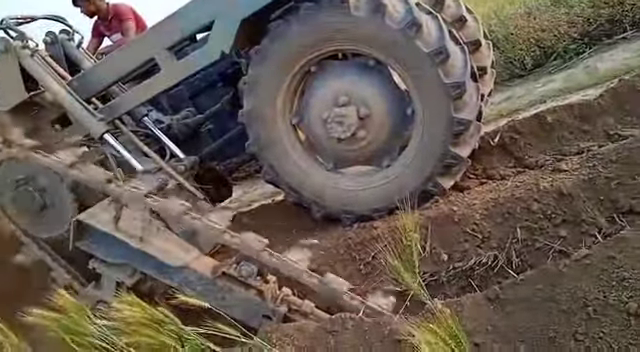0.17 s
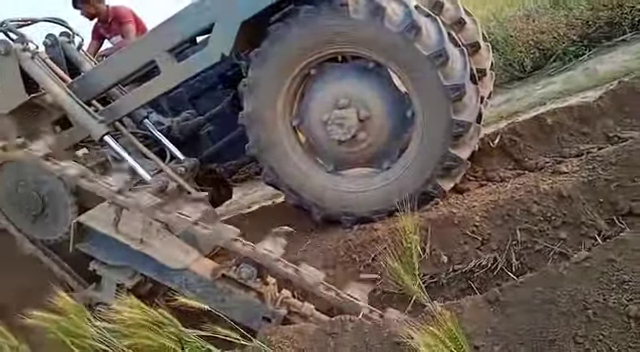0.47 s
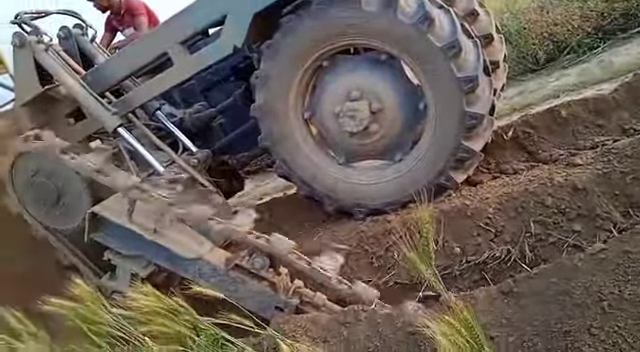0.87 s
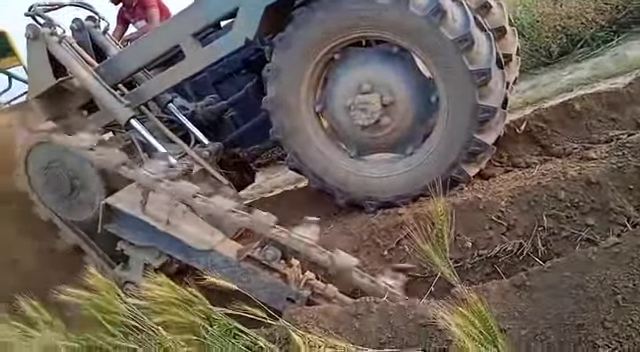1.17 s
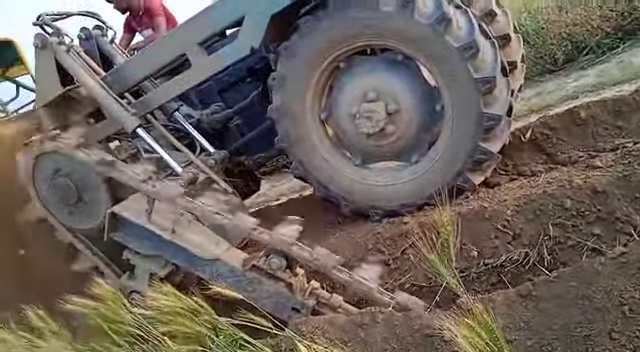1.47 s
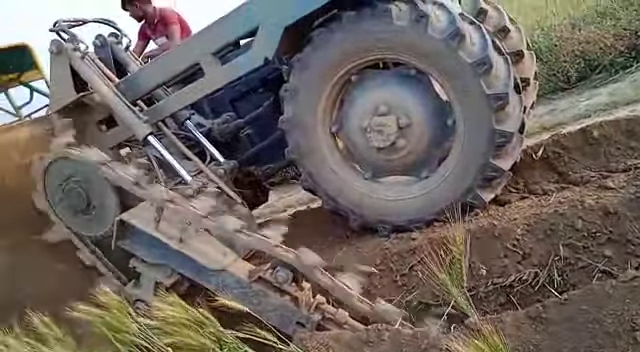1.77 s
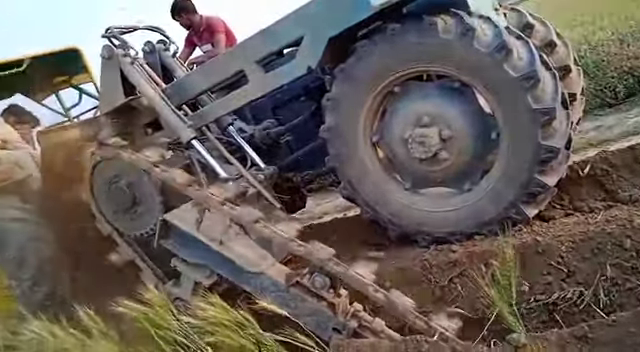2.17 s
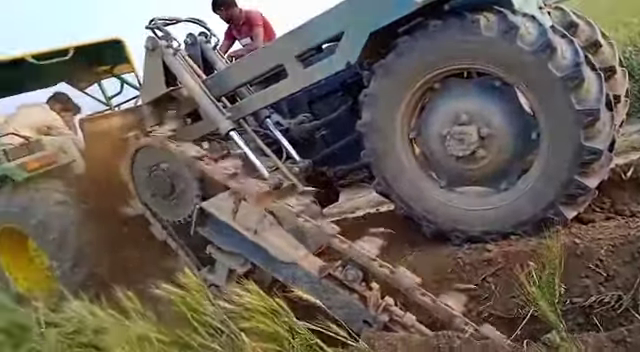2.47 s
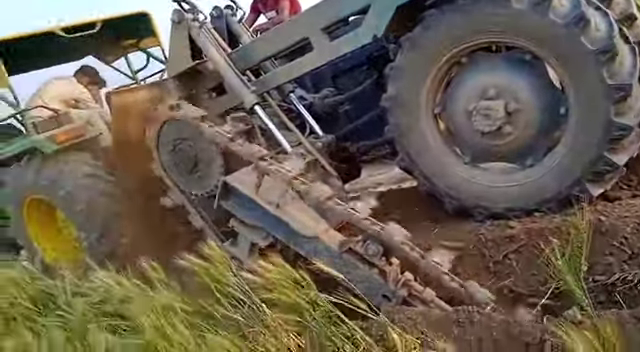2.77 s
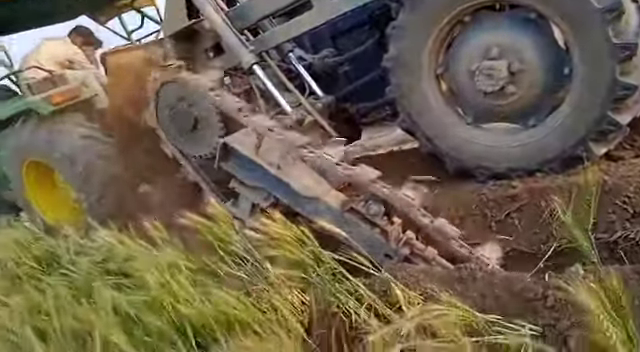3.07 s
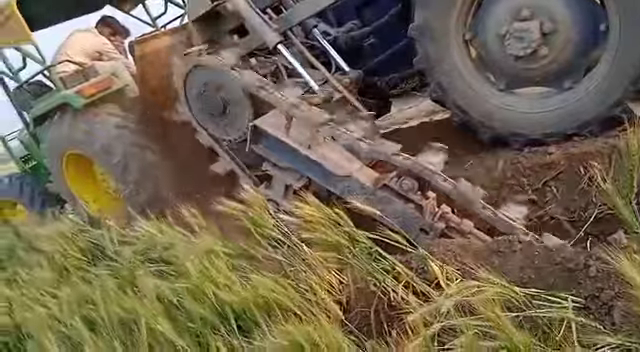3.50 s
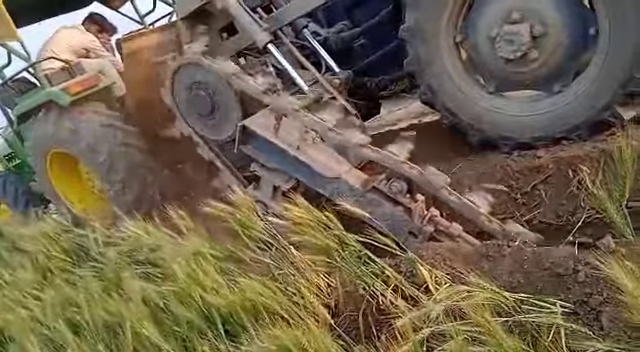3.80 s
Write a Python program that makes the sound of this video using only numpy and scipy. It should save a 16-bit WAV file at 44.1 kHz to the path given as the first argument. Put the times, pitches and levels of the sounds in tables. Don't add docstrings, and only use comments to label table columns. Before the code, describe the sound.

Loud close tractor diesel with a clanking, pinging trencher chain grinding steadily through earth

```python
import sys
import numpy as np
from scipy import signal
from scipy.fft import rfft, irfft, next_fast_len
from scipy.io import wavfile
from scipy.ndimage import uniform_filter1d, map_coordinates

SR = 44100
rng = np.random.default_rng(int(sys.argv[2]) if len(sys.argv) > 2 else 0)


def decibels_to_gain(level_db):
    exponent = np.asarray(level_db, float) / 20
    return 10 ** exponent


def output_pcm(signal):
    pcm = np.clip(np.atleast_2d(signal).T, -1, 1) * 32767
    wavfile.write(sys.argv[1], SR, np.round(pcm).astype(np.int16))


N = 173754

# time in seconds, level in dB.
EFFORT = [(0.0, -27), (.45, -24.5), (.9, -27), (1.3, -27.5), (1.63, -27.5), (1.95, -26.5), (2.23, -25),
          (2.6, -25.5), (2.95, -27.5), (3.3, -27), (3.6, -27), (3.94, -28)]
# time in seconds, lead in cycles.
CRANK_LEAD = [(0, .02), (.8, .01), (1.4, -.1), (2.1, -.09), (2.5, 0), (3, -.08), (3.5, -.18), (3.94, -.17)]
CYLINDER_DB = [-3, -5, -3.5, -6.5]
# frequency in Hz, gain in dB.
BLOCK = [(500, -21), (900, -8), (1700, 0), (2600, -3), (3600, -11.5), (5400, -12.5), (6500, -7),
         (8000, -14)]
# time in seconds, level in dB.
EXHAUST = [
    (0.0, -46),
    (0.06, -40),
    (0.44, -37),
    (3.94, -45),
]
# start in seconds, peak in dB, ring in Hz.
CLANKS = [(0.0547, -10.5, 1610), (0.1123, -17, 1830), (0.166, -8, 1717), (0.2243, -12.5, 1800),
          (0.5493, -18.5, 2455), (0.6148, -15, 1270), (0.7813, -13, 1616), (1.0096, -17, 2020),
          (1.346, -24.5, 1600), (1.519, -27, 1260), (1.583, -14, 1354), (1.6268, -19, 2430),
          (1.6832, -12.5, 1670), (1.786, -18.5, 2380), (1.8487, -21.5, 2080), (1.9015, -13, 1926),
          (1.9605, -10.5, 1796), (2.0127, -24, 1340), (2.0698, -10.5, 1597), (2.1288, -13.5, 1774),
          (2.1824, -11.5, 1720), (2.346, -33, 1730), (2.459, -15.5, 1346), (2.6883, -11, 1770),
          (3.1981, -12.5, 1745), (3.3637, -16, 1654), (3.4337, -11.5, 1800), (3.7515, -16, 2314)]
# start in seconds, peak in dB, ring in Hz.
STONES = [(0.015, -13, 2720), (0.073, -23, 2190), (0.186, -9, 1680), (0.237, -20.5, 1780),
          (0.3016, -17.5, 2420), (0.385, -12.5, 1180), (0.656, -14.5, 2410), (0.6794, -12.5, 1062),
          (0.6982, -15.5, 2450), (0.9082, -13, 1820), (1.4008, -14, 1940), (1.4162, -16, 2330),
          (1.5178, -15, 1260), (2.0308, -16.5, 1380), (2.1444, -22, 2400), (2.2474, -25.5, 1690),
          (2.36, -13, 1715), (2.4173, -14, 1800), (2.528, -15.5, 1280), (2.6279, -16.5, 3270),
          (2.6993, -10, 1495), (2.909, -14, 1600), (2.9946, -39, 2070), (3.0201, -25, 2840),
          (3.2121, -14, 1660), (3.2496, -14.5, 1040), (3.5446, -20, 1730), (3.7235, -23, 2410),
          (3.8253, -23.5, 2270), (3.9167, -21, 1480)]
# start in seconds, peak in dB, ring in Hz.
PINS = [(.0174, -12, 3330), (.0717, -27.5, 3620), (.2224, -15, 3204), (.6739, -17, 3170), (.965, -26, 3330),
        (1.0086, -20, 3280), (1.5189, -16.5, 3060), (1.905, -19.5, 3080), (2.0138, -22, 3160),
        (2.031, -16, 3220), (2.1425, -17.5, 3280), (2.2368, -14.5, 3230), (2.249, -17, 3240),
        (2.4598, -19.5, 3370), (2.478, -21, 3290), (2.6863, -19, 3210), (3.5289, -19, 2980),
        (3.825, -18.5, 3040)]
# start in seconds, peak in dB, ring in Hz.
THROBS = [(.286, -26, 256), (.372, -27, 290), (.47, -27, 265), (.625, -36, 285), (.72, -21.5, 251),
          (.876, -32, 278), (1.156, -23, 267.4), (1.26, -28, 256), (1.436, -20.5, 269.6), (1.59, -34, 260),
          (1.698, -20.5, 257.3), (2.345, -21, 260), (2.42, -19.5, 277), (2.86, -23, 267),
          (2.96, -21, 253.5), (3.26, -30, 260), (3.477, -21.5, 249.7), (3.687, -22, 264), (3.878, -30, 295)]
# start in seconds, peak in dB, ring in Hz.
PINGS = [(0.0543, -29.5, 6730), (0.1412, -16.5, 6420), (0.2234, -14.5, 6440), (0.3084, -13.5, 6670),
         (0.3587, -15, 7130), (0.4165, -25, 6130), (0.5378, -19, 6170), (0.615, -19, 6330),
         (0.6607, -28, 5900), (0.6784, -15, 6200), (0.7, -17, 5950), (0.7392, -29.5, 6170),
         (0.8195, -25, 7170), (0.996, -12, 7230), (1.0517, -28, 6630), (1.185, -24, 6000),
         (1.2072, -27.5, 6000), (1.4185, -22, 6200), (1.5422, -16.5, 7160), (1.5688, -20.5, 6500),
         (1.735, -17, 6420), (1.837, -17, 6820), (1.8637, -19.5, 6240), (1.921, -16, 6170),
         (1.962, -28, 6970), (2.0133, -15.5, 6270), (2.073, -13.5, 6930), (2.1291, -16, 6640),
         (2.2382, -9, 6550), (2.4593, -7, 6570), (2.5516, -23, 6140), (2.568, -18.5, 6170),
         (2.604, -19.5, 6430), (2.6294, -15, 6450), (2.7432, -28, 6400), (2.9108, -17.5, 7260),
         (2.9278, -17, 6270), (2.9965, -17.5, 5840), (3.1958, -25, 6070), (3.2126, -19, 6170),
         (3.237, -15.5, 6200), (3.4361, -7, 6170), (3.5289, -10, 6590), (3.5543, -14, 6900),
         (3.5982, -12, 6220), (3.696, -26.5, 7020), (3.7244, -19, 6250), (3.7813, -17, 6800),
         (3.823, -22.5, 6200), (3.8624, -22, 6740), (3.9015, -21, 6180), (3.917, -14.5, 5980)]
# start in seconds, peak in dB, ring in Hz.
TEETH = [
    (0.617, -27, 5050),
    (1.2391, -23, 5600),
    (1.9, -24, 5760),
    (2.0747, -14.5, 5470),
    (2.6274, -17, 5030),
    (2.9163, -20, 4300),
    (.366, -25.5, 4600),
    (.675, -28, 5150),
    (2.42, -23, 4000),
    (1.8, -26, 4060),
]
# frequency in Hz, gain in dB.
BOOM = [(500, -19.5), (900, -7), (1700, 0), (2600, -6.5), (3600, -12), (5400, -12.5), (6500, -11),
        (8000, -18)]
# frequency in Hz, gain in dB.
SPROCKET = [(4500, -30), (5900, -14), (6200, 0), (7000, -3), (8200, -20)]
# frequency in Hz, gain in dB.
ROAR = [(320, -37.5), (550, 2.5), (1040, 1), (1220, -4), (2410, 0), (3730, -16), (5350, -25), (6390, -10.5),
        (8000, -29), (10400, -59.5), (17600, -120)]
# frequency in Hz, gain in dB.
RUMBLE = [(15, -56.5), (25, -39), (56, -12.5), (151, -8.5), (264, -1.5), (342, -5), (462, -6), (599, -18.5),
          (650, -6), (840, -43.5), (1430, -120)]
# start in seconds, peak in dB.
PLATE_BLOWS = [(.26, -38), (0.4994, -32), (0.5706, -36), (0.7402, -29), (0.8185, -34), (1.07, -33),
               (1.19, -37), (1.26, -35), (1.3294, -31), (1.6994, -31), (1.8058, -34), (1.8994, -29),
               (2.0178, -31), (2.1784, -31), (2.2493, -31), (2.5594, -34), (2.9163, -33), (3.0864, -36),
               (3.2495, -33), (3.545, -33), (3.685, -32), (3.8342, -36)]
# centre in Hz, width in Hz, level in dB.
FRAME = [(458, 31, -8.5), (890, 8.7, -7.5), (1040, 16, -4.5), (1385, 61, -10.5), (1686, 63, -9.5),
         (2545, 140, -13.5), (6170, 130, -4.5), (6570, 91, -10)]
# time in seconds, share of the later bearing from 0 to 1.
TURN = [(0, 0), (1.9, 0), (2.3, 1), (3.94, 1)]
# frequency in Hz, gain in dB.
MICROPHONE = [(25, -12), (55, -12), (68, -1.5), (7600, 0), (8200, -14.5), (8570, -36), (8750, -71.5),
              (12000, -90)]

PLATE_HZ = 4358


def unit(x):
    return x / np.sqrt(np.mean(x ** 2) + 1e-20)


def curve(rows):
    s, value = np.transpose(rows)
    return np.interp(np.arange(N) / SR, s, value)


def wobble(rate):
    knots = rng.standard_normal(int(N * rate / SR) + 4)
    return map_coordinates(knots, [np.arange(N) * rate / SR])


def filtered(x, response):
    size = next_fast_len(N + 8192)
    return irfft(rfft(x, size) * response(np.fft.rfftfreq(size, 1 / SR)), size)[:N]


def colour(points):
    hz, db = np.transpose(points)
    return lambda f: decibels_to_gain(np.interp(np.log(f + 1), np.log(hz + 1), db))


def peak(centre_hz, width_hz):
    return lambda f: 1j * f * width_hz / (centre_hz ** 2 - f * f + 1j * f * width_hz)


def rush(response, patchy_db):
    z = signal.stft(rng.standard_normal(N), nperseg=512)[2]
    field = uniform_filter1d(rng.standard_normal(z.shape), size=5, axis=0)
    field = uniform_filter1d(field, size=8, axis=1)
    noise = signal.istft(z * decibels_to_gain(patchy_db * unit(field)), nperseg=512)[1][:N]
    return unit(filtered(noise, response))


def rings(s, db, hz, t60, rise_s):
    t = np.arange(int(SR * np.clip(t60, .005, .5) * .8)) / SR
    envelope = decibels_to_gain(-60 * t / t60) * (1 - np.exp(-t / rise_s))
    tone = np.sin(2 * np.pi * hz[:, None] * t) * envelope
    at = np.round(s * SR).astype(int)[:, None] + np.arange(len(t))
    return np.bincount(at.ravel(), (decibels_to_gain(db)[:, None] * tone).ravel(), N + SR)[:N]


def bursts(s, db, t60, points):
    spikes = np.bincount(np.round(s * SR).astype(int), decibels_to_gain(db), N + SR)[:N]
    decay = decibels_to_gain(-60 * np.arange(SR // 8) / SR / t60)
    return signal.fftconvolve(spikes, decay)[:N] * rush(colour(points), patchy_db=3.5)


def engine_knock(effort_db):
    t = np.arange(N) / SR
    cycles = 17.9 * t + curve(CRANK_LEAD)
    firing = np.arange(0, int(cycles[-1] * 4))
    draw = rng.uniform(-1.7, 1.7, (len(firing), 4))
    jitter_s = .0009 * draw[:, 0]
    s = np.abs(np.interp(firing / 4, cycles, t) + jitter_s)
    db = np.array(CYLINDER_DB)[firing % 4] + 2.6 * draw[:, 1]
    mode_hz = 1800 * np.exp(0.37 * draw[:, 3])
    burst = unit(bursts(s, db, 0.058, BLOCK))
    modes = unit(rings(s, db + 2 * draw[:, 2], mode_hz, t60=0.065, rise_s=0.00022))
    return decibels_to_gain(effort_db) * (decibels_to_gain(-4) * burst + decibels_to_gain(-13) * modes)


def exhaust_and_hum():
    t = np.arange(N) / SR
    boom_db = -1.5 + curve(EXHAUST) + 0.71 * wobble(17)
    boom = decibels_to_gain(boom_db) * rush(peak(270.7, 57), patchy_db=1.5)
    hum_level = decibels_to_gain(-54.5 + 1.2 * wobble(1.8)) * np.sqrt(2)
    return boom + hum_level * np.sin(2 * np.pi * 71.5 * t + 1.3 * wobble(0.57))


def chain_blows():
    out = 0
    # table, t60 in seconds, gain of the crack, rise in seconds, struck body
    kinds = ((CLANKS, 0.065, 1.09, .0004, BOOM), (STONES, 0.065, 1.38, .0006, BOOM),
             (PINS, .07, 0, .0007, BOOM), (THROBS, 0.39, 0, 0.01232, BOOM),
             (PINGS, .04, 0.62, .0007, SPROCKET), (TEETH, 0.065, 0, .0007, SPROCKET))
    for rows, t60, crack, rise_s, body in kinds:
        s, db, hz = np.transpose(rows)
        start = s - rise_s
        out = out + rings(start, db - 7, hz, t60, rise_s)
        out = out + crack * bursts(start, db - 12, 0.054, body)
    for rows, body in ((CLANKS, BOOM), (STONES, BOOM), (PINGS, SPROCKET)):
        s, db, hz = np.transpose(rows)
        out = out + bursts(s, db - 9, .014, body)
    return out


def link_rattle(effort_db):
    draw = rng.random((int(220 * N / SR), 3))
    hz = 6550 * np.exp(0.056 * 3.8 * (draw[:, 1] - .5))
    db = -4 * np.log(draw[:, 2] + 0.022)
    rattle = rings(draw[:, 0] * N / SR, db, hz, t60=0.0099, rise_s=0.00052)
    return decibels_to_gain(effort_db - 19.5 + 2.5 * wobble(9)) * unit(rattle)


def soil_roar(effort_db):
    low_hz, high_hz = 650, 7800
    draw = rng.random((int(450 * N / SR), 3))
    hz = low_hz * (high_hz / low_hz) ** draw[:, 1]
    db = 10 * np.log10(hz) - 4 * np.log(draw[:, 2] + 0.034)
    steel = rings(draw[:, 0] * N / SR, db, hz, t60=0.058, rise_s=0.00019)
    chatter = unit(filtered(steel, colour(ROAR)))
    soil = decibels_to_gain(2.0 * wobble(45)) * rush(colour(ROAR), patchy_db=2.5)
    return decibels_to_gain(effort_db - 3 + 1.5 * wobble(6)) * unit(soil + decibels_to_gain(-3) * chatter)


def guard_plate():
    s, db = np.transpose(PLATE_BLOWS)
    hz = PLATE_HZ + 14 * rng.uniform(-1.1, 1, len(s))
    struck = rings(s, db - 7, hz, t60=.4, rise_s=0.0017)
    song = decibels_to_gain(-53) * rush(peak(PLATE_HZ, 30), patchy_db=1.5)
    return struck * decibels_to_gain(4 * wobble(40)) + song


def ground_rumble(effort_db):
    level_db = -37 + (effort_db - effort_db.mean()) + 1.7 * wobble(18)
    return decibels_to_gain(level_db) * rush(colour(RUMBLE), patchy_db=1.5)


def frame_response(f):
    return 1 + sum(decibels_to_gain(db) * peak(hz, width_hz)(f) for hz, width_hz, db in FRAME)


def ground_echo(near):
    before = .68 * filtered(near, peak(590, 170))
    after = .45 * filtered(near, peak(540, 130))
    turn = curve(TURN)
    return near - (1 - turn) * before - turn * after


def scene():
    effort_db = curve(EFFORT)
    engine = engine_knock(effort_db) + exhaust_and_hum()
    chain = chain_blows() + link_rattle(effort_db)
    digging = soil_roar(effort_db) + guard_plate() + ground_rumble(effort_db)
    return ground_echo(filtered(engine + chain + digging, frame_response))[None]


def top_cut(x):
    return signal.sosfilt(signal.butter(12, 8580, fs=SR, output="sos"), x)


def record(dry):
    held = dry[0] / (1 + np.abs(dry[0] / .42) ** 4) ** .25
    return top_cut(filtered(held, colour(MICROPHONE))[None])


dry = scene()
out = record(dry)
output_pcm(out)
```